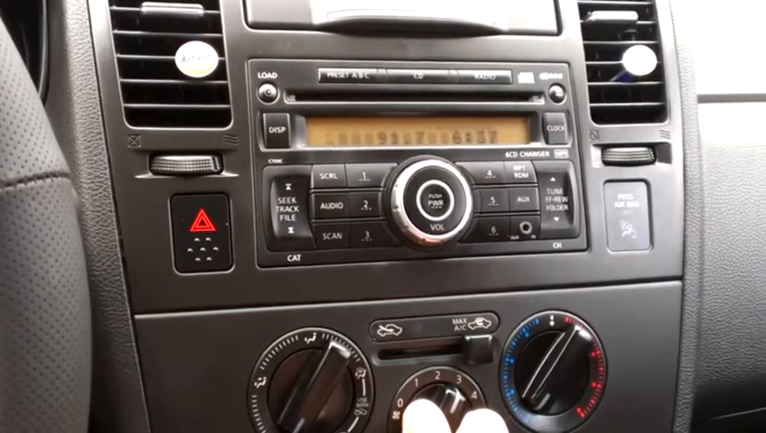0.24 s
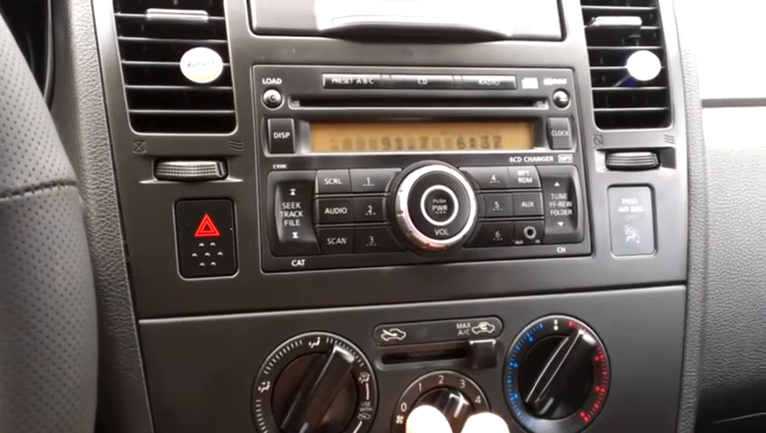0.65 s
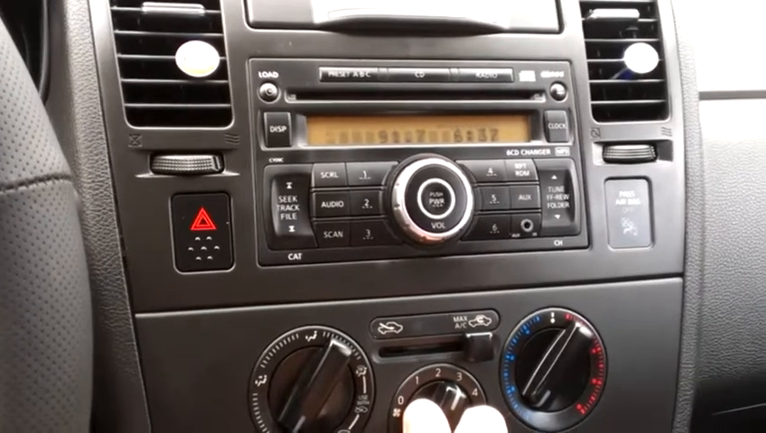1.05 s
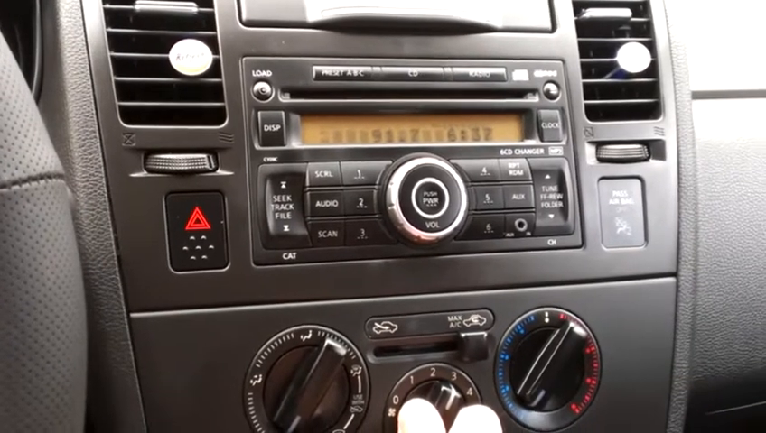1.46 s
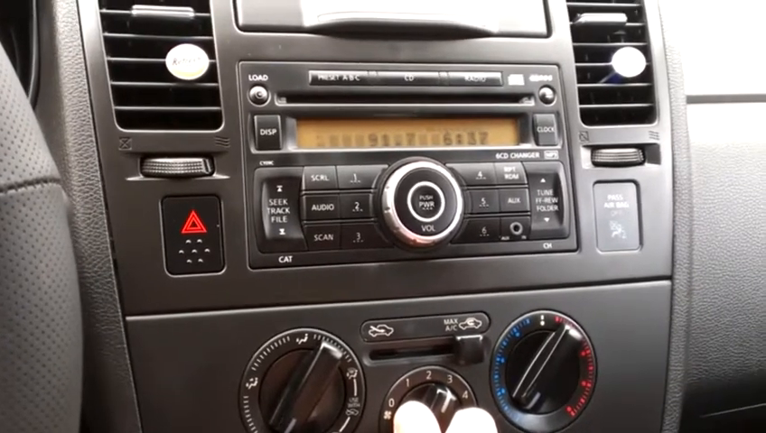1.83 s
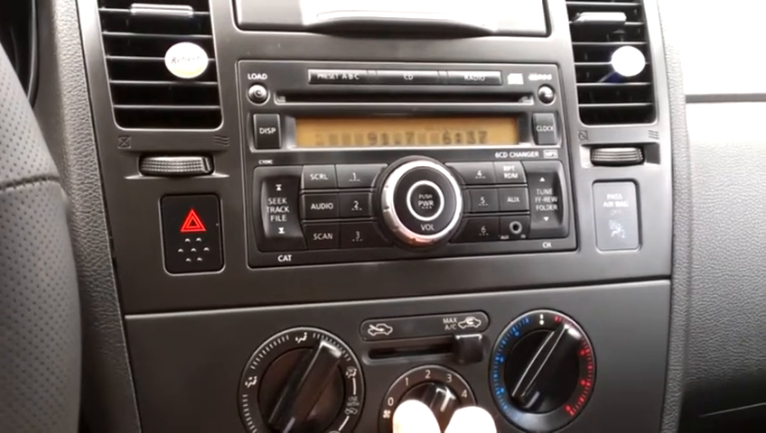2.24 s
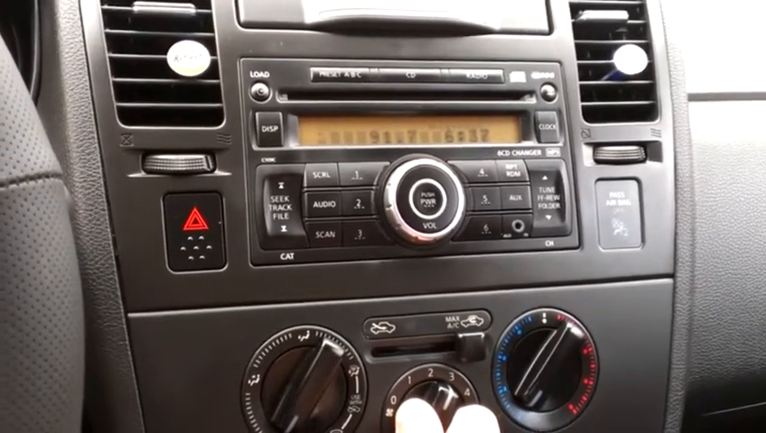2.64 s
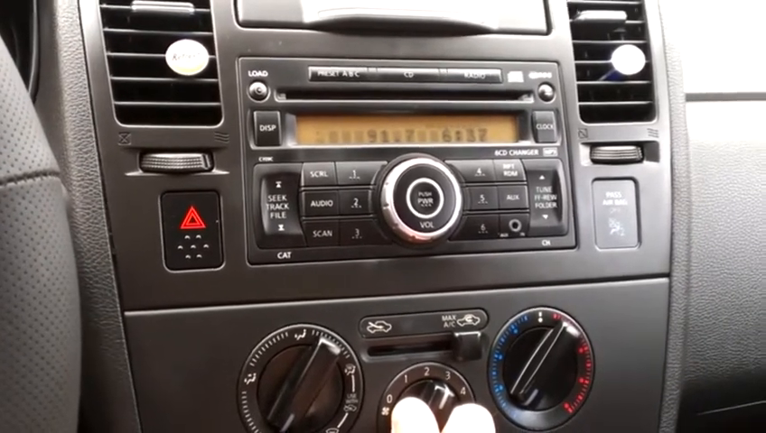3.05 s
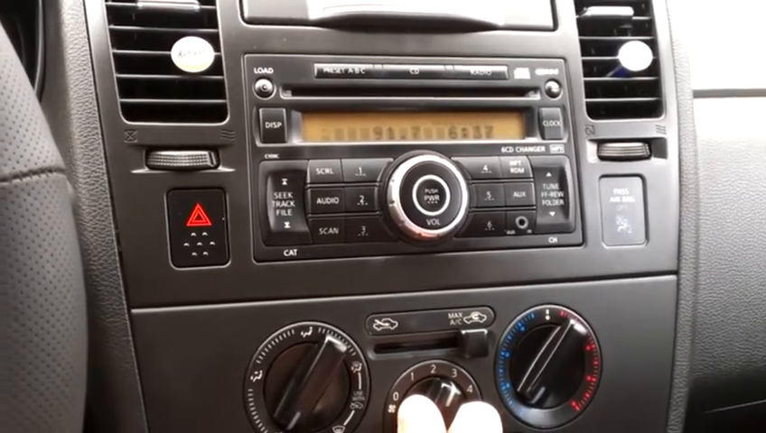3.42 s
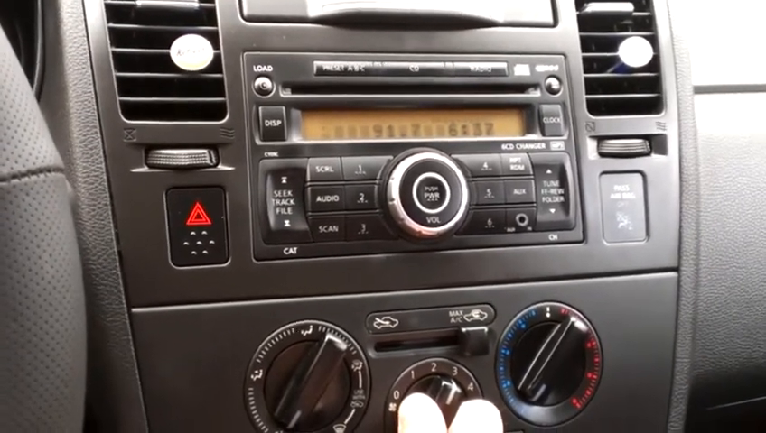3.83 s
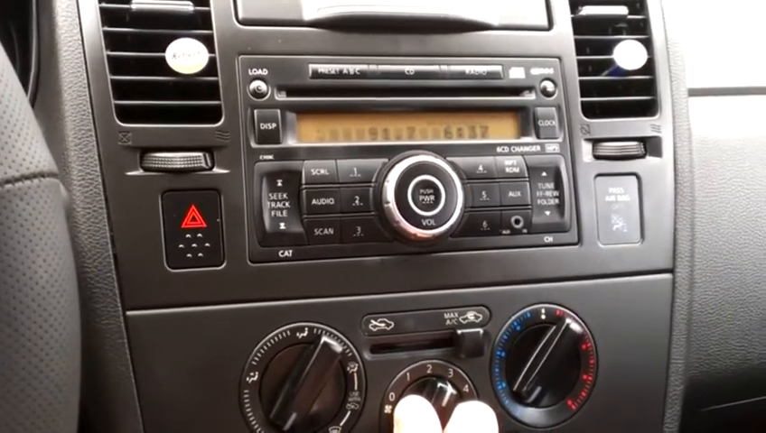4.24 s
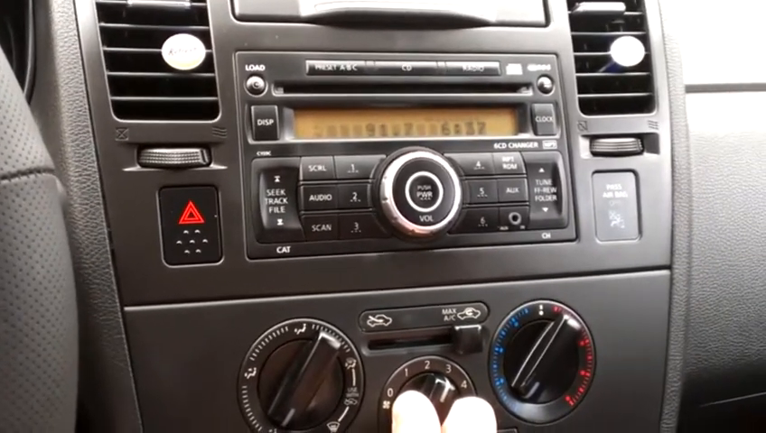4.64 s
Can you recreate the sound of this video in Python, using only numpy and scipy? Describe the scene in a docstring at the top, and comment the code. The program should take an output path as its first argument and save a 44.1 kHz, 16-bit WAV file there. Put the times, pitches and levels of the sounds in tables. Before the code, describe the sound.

Inside a small, closed car cabin, the ventilation blower runs on a high setting. Air rushes steadily through the vents above a low motor hum. The jet hits the stereo microphone close by, making irregular, rapid, dull thumps, mostly stronger on the right. The hiss briefly dulls under strong puffs and opens into airy wisps between them. Nothing starts or stops.

```python
"""A car's air-conditioning blower runs on a high setting, heard from just in front of the dash vents.
The fan wheel hums on the orders of its shaft, air rushes through ducts and louvres into the small cabin,
and the jet from the vents buffets the two microphone ports with a fluttering run of soft thumps.
The recorder turns the treble down for a moment whenever the buffeting is strong."""
import sys
import numpy as np
from scipy import signal
from scipy.fft import rfft, irfft, next_fast_len
from scipy.io import wavfile
from scipy.ndimage import uniform_filter1d, map_coordinates

SR = 44100
rng = np.random.default_rng(int(sys.argv[2]) if len(sys.argv) > 2 else 0)


def bounce(signal):
    """Save signal as a 16-bit WAV file at the path given by the first command-line argument."""
    frames = np.transpose(np.atleast_2d(signal))
    limited = np.clip(frames, -1, 1)
    pcm = np.round(limited * 32767).astype(np.int16)
    wavfile.write(sys.argv[1], SR, pcm)


N = 210979

# blower wheel: (s, turns per second Hz)
SHAFT = [(0.0, 44.96), (0.23, 45.7), (0.53, 45.7), (1.4, 45.51), (1.84, 45.82), (3.78, 45.87), (4.26, 46.01), (4.78, 46.2)]  # fixed
# hum and whine of the wheel: (multiple of the shaft rate, left dB, right dB)
WHEEL = [(2, -51, -50.6), (3, -33.2, -33.7), (4, -43.1, -41.7), (8, -42.6, -37.0), (13, -56.6, -53.9),
         (14, -57.3, -52.7), (17, -57.9, -58.5), (18, -57.1, -57.9), (19, -57.1, -57.0), (21, -57.9, -53.0),
         (22, -52.6, -54.1), (23, -52.8, -54.2), (24, -55.5, -55.8), (26, -62.5, -60.7), (29, -73.2, -60.6),
         (42, -60.9, -55.5), (43, -59.9, -60.5), (45, -63.8, -60.1), (46, -71.9, -61.6), (51, -65.0, -65.0),
         (60, -69.5, -72.0), (136, -76.5, -66.5), (143, -80, -70), (148, -73, -68)]  # fixed
# rush of air from the vents: (Hz, dB per Hz)
RUSH = [(60, -28), (250, 14.5), (820, 0.5), (1120, -2), (1230, -6.5), (1480, -7), (2200, -5), (2600, -7), (3200, -16.5), (4400, -26), (5200, -20), (7100, -16), (7900, -48), (11000, -57), (15000, -75)]
# duct and louvre resonances: (Hz, width Hz, left dB, right dB)
DUCTS = [(1022.4, 74, -49.5, -50.5), (1093, 63, -51.5, -52.5), (1700, 54, -60.5, -59), (1956, 80, -54.5, -56.5), (2071, 100, -67.5, -53), (2308, 77, -56, -58), (3510, 90, -70, -70), (3966, 440, -78, -57.5), (4330, 450, -68.5, -77), (5330, 800, -72.5, -60), (6350, 890, -89.5, -61)]
# slow level of the treble: (s, dB)
HISS = [(0, -2.5), (.33, -0.5), (.53, -5.5), (.8, -0.5), (1.4, -1), (2.05, 0.5), (2.45, -3.5), (2.8, 0), (3.5, -1.5), (4.15, -1), (4.5, -4.5), (4.78, -6)]
# strength of the jet as it wanders over the ports: (s, left dB, right dB)
JET = [(0, -24.5, -19), (0.55, -26, -19), (0.85, -26.5, -20), (1.35, -27, -19.5), (1.65, -20, -23),
       (1.9, -27, -21.5), (2.3, -21, -19), (3.0, -27.5, -19), (3.35, -19, -24.5), (3.65, -23.5, -21.5),
       (3.9, -26, -21.5), (4.15, -26, -20), (4.35, -29.5, -18), (4.78, -25.5, -20.5)]
# turbulence at a port: (Hz, dB per Hz)
BUFFET = [(30, -45), (70, -28.5), (90, -13.5), (125, -3.5), (180, 3.5), (260, 5.5), (360, 1), (500, -13.5), (700, -37), (1000, -33), (1600, -66), (6000, -110)]
# rough, tearing air around a strong eddy: (Hz, dB per Hz)
TEAR = [(200, -21.5), (450, 3.5), (620, -5), (850, -9), (1150, -26), (3000, -86.5)]
# the strongest eddies that hit the ports: (s, peak dB, pitch Hz, left minus right dB)
EDDIES = [(0.024, -8.0, 300, -12), (0.059, -12.0, 280, -13), (0.093, -13.0, 280, -9),
          (0.177, -8.5, 335, -10), (0.228, -12.0, 300, -6), (0.255, -7.0, 325, -11),
          (0.353, -8.5, 370, -10), (0.432, -11.5, 270, -9), (0.467, -9.5, 285, -11), (0.509, -8.5, 335, -11), (0.532, -10.0, 350, -7),
          (0.546, -11.5, 325, -5), (0.59, -10.5, 345, -14), (0.623, -4.0, 375, -11), (0.656, -11.0, 330, -9),
          (0.718, -9.5, 335, -12), (0.781, -12.5, 315, -8), (0.809, -13.0, 375, -12), (0.899, -10.0, 330, -11), (0.909, -8.5, 365, -10),
          (0.946, -13.0, 280, -7), (1.03, -13.0, 300, -13), (1.065, -15.0, 340, 8), (1.085, -11.5, 345, -7),
          (1.217, -13.0, 250, -10), (1.246, -9.5, 360, -12), (1.261, -13.5, 300, -12), (1.313, -12.0, 305, -13), (1.335, -13.5, 420, -13),
          (1.432, -4.0, 400, -11), (1.56, -13.0, 300, -1), (1.583, -10.0, 250, 0), (1.6, -12.5, 260, -11), (1.631, -13.0, 280, 14),
          (1.697, -12.0, 315, -6), (1.758, -11.5, 320, -10), (1.785, -9.5, 270, -9),
          (1.822, -13.0, 260, -6), (1.841, -12.0, 290, -12), (1.911, -13.0, 280, -9),
          (1.971, -10.5, 430, -11), (2.05, -12.5, 340, -11), (2.094, -9.5, 280, -8),
          (2.193, -14.0, 385, -6), (2.205, -14.0, 310, 6),
          (2.303, -9.0, 280, -8), (2.321, -13.0, 350, -12), (2.335, -12.5, 350, -12),
          (2.411, -10.5, 285, -10), (2.465, -12.0, 350, -9), (2.477, -8.5, 335, -9), 
          (2.491, -12.5, 270, -8), (2.533, -12.5, 370, -8), (2.541, -12.0, 325, -9),
          (2.59, -13.0, 390, -10), (2.618, -13.0, 310, -10), (2.665, -9.0, 340, -12), (2.823, -9.5, 340, -10), (2.891, -9.5, 345, -10),
          (2.94, -12.0, 315, -5), (3.023, -13.5, 330, -10), (3.075, -12.5, 380, -8), (3.186, -12.5, 375, -9), (3.203, -10.0, 410, -10),
          (3.278, -10.0, 275, -7), (3.367, -11.5, 290, -3), (3.395, -12.0, 350, -5), (3.417, -11.0, 340, -9), (3.569, -10.5, 320, -10),
          (3.642, -12.0, 310, -6), (3.697, -11.5, 350, 5), (3.772, -13.5, 370, -11), (3.789, -11.0, 295, -12), (3.811, -10.0, 365, -12), (3.911, -12.0, 260, -10),
          (3.921, -11.5, 335, -10), (3.942, -9.0, 350, -9), (4.007, -10.5, 290, -3), (4.051, -13.0, 360, -9), (4.216, -12.5, 420, -11),
          (4.303, -11.5, 325, 11), (4.313, -11.5, 270, 8), (4.323, -11.0, 325, -5), 
          (4.343, -10.0, 370, -11), (4.424, -12.0, 370, -11), (4.435, -6.0, 375, -5),
          (4.469, -13.5, 310, -4), (4.493, -13.0, 345, -9), (4.539, -10.5, 310, -14), (4.57, -6.5, 430, -14),
          (4.626, -11.5, 365, 8), (4.671, -9.5, 335, -7), (4.719, -8.0, 355, -10), (4.753, -13.0, 310, -10), (4.777, -11.0, 330, -11)]  # fixed
# low drone of the cabin: (Hz, dB per Hz)
DRONE = [(15, -9), (32, 3.5), (47, 16.5), (60, 11), (70, -0.5), (110, -35), (1000, -80)]
FLUTTER_DB, FLUTTER_HZ = 1, 11  # chance rise and fall of the jet
TOP_HZ = 14000  # fixed
TIME = np.arange(N) / SR
DUCK_KNEE_DB, DUCK_DEPTH_DB, DUCK_WINDOW_S = -14.5, 18, 0.016  # treble suppressor: half-way level, full cut, averaging time
# depth of the wavering of the low hum and of the high whine (share of their level)
HUM_WAVER, WHINE_WAVER = .13, .5  # fixed
# balance of the hiss: (left dB, right dB)
HISS_SIDES_DB = (-1.5, 1.5)  # fixed
# share of the treble cut that each channel takes: (left, right)
DUCK_SIDES = (1.2, 1)  # fixed
GUST_DB, GUST_FROM_DB = -3, -10  # the smooth churn gives way around a strong eddy (dB at full), and the eddy level from which this appears
# lulls of the jet, in which the treble opens up as a brief wisp: (s, length s, level dB)
WISPS = [(.015, .04, -4), (.31, .05, 0), (.745, .03, -9), (.86, .055, 0), (1.06, .04, -3),
         (1.125, .035, 1), (1.185, .045, -1), (1.38, .07, 0), (1.467, .035, -1), (1.54, .05, 0), (1.655, .035, -3),
         (1.725, .045, -2), (1.87, .04, -2), (2.015, .06, 1), (2.13, .03, -2), (2.27, .055, -4),
         (2.6, .035, -7), (2.75, .05, -4), (2.853, .03, -3), (2.917, .03, -7), (2.99, .06, -3), (3.325, .07, -5),
         (3.48, .06, -1), (3.74, .05, -2), (4.09, .035, -9), (4.165, .05, -9), (4.405, .03, -13)]  # fixed
# airy top of a wisp: (Hz, dB per Hz)
AIR = [(5000, -34), (7400, 4), (8200, 3.5), (11700, -1.5), (12300, -11.5), (14000, -19)]
# the treble dips briefly: (s, length s, depth dB)
DIPS = [(.177, .025, 22), (.475, .035, 26), (.54, .045, 26), (.912, .025, 9), (1.245, .032, 24), (1.44, .018, 14),
        (1.815, .05, 6), (2.478, .028, 22), (3.215, .04, 7), (3.56, .035, 7), (3.945, .045, 14), (4.475, .06, 8), (4.57, .032, 28)]  # fixed
WISP_DB, WISP_LIFT_DB = -58.5, 3  # at a full wisp: its airy top, the rise of the hiss
# fall of the jet in a lull: (left dB, right dB)
LULL_SIDES_DB = (-2.5, -8)  # fixed
# balance of a wisp: (left dB, right dB)
WISP_SIDES_DB = (-6, 4)  # fixed
# slow wandering of each duct resonance (dB, share of its pitch, changes per second)
DUCT_SWELL_DB, DUCT_DRIFT, DUCT_WANDER_HZ = 2, .01, 5  # fixed
# swelling of the drone: spread (dB), changes per second
DRONE_SWELL_DB, DRONE_SWELL_HZ = 1.2, 6  # fixed
# colour of a tick: (Hz, dB per Hz)
TICK = [(800, -16), (3000, 5.5), (7000, 5), (10500, -3), (13000, -29)]
# faint ticks: (s, level dB)
TICKS = [(0.615, -47), (3.279, -45), (4.302, -44), (4.324, -50)]  # fixed
# the rush flickers band by band: spread (dB), changes per second, edges of the bands (Hz)
FLICKER_DB, FLICKER_HZ, FLICKER_EDGES_HZ = 2, 20, (600, 950, 1300, 2000, 2900, 4000, 5500)  # fixed
GUST_RISE_S, GUST_FALL_S = .004, .015  # fixed


def undb(db):
    """Decibels to gain."""
    return 10 ** (np.asarray(db) / 20)


def unit(x):
    """Scale each channel to rms 1."""
    return x / np.sqrt(np.mean(x ** 2, axis=-1, keepdims=True))


def curves(table):
    """The columns of a timed table, one value per sample."""
    s, *columns = np.transpose(table)
    return np.array([np.interp(TIME, s, c) for c in columns])


def walk(rate):
    """Smooth chance with spread 1 that changes about rate times a second."""
    f = np.fft.rfftfreq(2048, 1 / 200)  # fixed
    slow = irfft(rfft(rng.standard_normal(2048)) * np.exp(-(f / rate) ** 2))  # fixed
    return unit(np.interp(TIME, np.arange(2048) / 200, slow))  # fixed


def colour(x, points):
    """Give a sound the spectrum of (Hz, dB) points, at rms 1."""
    hz, db = np.transpose(points)
    size = next_fast_len(N, True)
    f = np.maximum(np.fft.rfftfreq(size, 1 / SR), 1)
    return unit(irfft(rfft(x, size) * undb(np.interp(np.log(f), np.log(hz), db)), size)[..., :N])


def pair(shared):
    """Noise at the two ports, with a share of its power in common."""
    shared = np.clip(shared, 0, 1)
    return np.sqrt(shared) * rng.standard_normal(N) + np.sqrt(1 - shared) * rng.standard_normal((2, N))


def split(x, hz):
    """The parts of a sound below and above a frequency."""
    low = signal.sosfiltfilt(signal.butter(2, hz, fs=SR, output="sos"), x)
    return low, x - low


def shelf(x, treble_db, mid_depth=0.099, top_depth=1.08):
    """Raise or lower the treble, the more the higher it lies; the bass stays as it is."""
    low, rest = split(x, hz=800)
    mid, rest = split(rest, hz=2630)
    high, top = split(rest, hz=6850)
    return low + mid * undb(mid_depth * treble_db) + high * undb(treble_db) + top * undb(top_depth * treble_db)


def cabin(x, t60, wet_db):
    """Glass and trim close by send dense, quickly dying reflections to each port."""
    t = TIME[:SR // 5]
    tail = rng.standard_normal((2, len(t))) * np.exp(-np.log(1000) * t / t60)
    tail /= np.sqrt(np.sum(tail ** 2, axis=1, keepdims=True))
    return unit(x + undb(wet_db) * signal.fftconvolve(x, tail, axes=1)[:, :N])


def port(x, corner_hz=125):
    """A microphone port sheds the slow part of a push, so each puff rebounds briefly."""
    leak = signal.butter(3, corner_hz, "highpass", fs=SR, output="sos")
    return signal.sosfilt(leak, signal.sosfilt(leak, x))


def add(out, s, gains, hz, length=5.6):
    """One eddy sweeps over the ports: the pressure swings up, then down; the faster it passes, the higher the
    thump."""
    near = slice(max(int((s - .015) * SR), 0), int((s + .015) * SR))  # fixed
    passage = 2 * np.pi * hz * (TIME[near] - s)
    turn = np.pi / 2 + .6 * rng.standard_normal()  # fixed
    swirl = np.exp(1j * turn) / (1 - 1j * passage / length) ** (length + .5)
    out[:, near] += np.outer(gains, swirl.real)


def wheel(turns, waver_hz=9, hum_db=0, whine_db=0):
    """Each shaft order is a line; uneven inflow shakes the high ones more than the low hum."""
    out = 0
    for multiple, left_db, right_db in WHEEL:
        waver, db = (HUM_WAVER, hum_db) if multiple < 10 else (WHINE_WAVER, whine_db)
        size = unit(np.abs(1 + waver * walk(waver_hz)))
        phase = 2 * np.pi * (multiple * turns + rng.random()) + waver * walk(waver_hz)
        out = out + undb([[left_db + db], [right_db + db]]) * np.sqrt(2) * size * np.sin(phase)
    return out


def vents(turns, body_db=(-39.5, -35), hiss_db=-35, throb=0.11, swish=0.68):
    """Air rushes through the grilles and rings the ducts, throbbing once for each turn of the wheel."""
    wobble = np.cos(2 * np.pi * turns)
    beat = 1 + throb * wobble
    # long waves reach both ports alike; short ones arrive scattered
    body, _ = split(cabin(colour(pair(shared=.72), RUSH), t60=.07, wet_db=-7), hz=2700)  # fixed
    _, hiss = split(cabin(colour(pair(shared=.65), RUSH), t60=.11, wet_db=3), hz=2700)  # fixed
    rings = 0
    for hz, width, left_db, right_db in DUCTS:
        band = signal.butter(2, [hz - width / 2, hz + width / 2], "bandpass", fs=SR, output="sos")
        ring = drift(signal.sosfilt(band, pair(shared=.9)))  # fixed
        rings = rings + undb([[left_db], [right_db]]) * ring
    # the treble adds a short swish at the crest of each turn
    crest = swish * np.exp(8 * (wobble - 1))
    return (body * undb(body_db)[:, None] + rings) * beat + hiss * undb(hiss_db) * undb(HISS_SIDES_DB)[:, None] * (beat + crest)


def buffeting(jet_db=-2.0, whirl_db=-7, whirl_hz=320, whirl_left_db=-4, whirl_octaves=0.92, tear_db=-30, count=520):
    """Patchy turbulence at the ports, strewn with small quick whirls; it flares and brightens around each strong eddy."""
    churn = colour(pair(shared=0.63), BUFFET)
    whirls = np.zeros((2, N))
    for place, size, speed, side in rng.random((count, 4)):
        add(whirls, place * TIME[-1], (0.52 + size) * np.array([0.18 + side, 1]), whirl_hz * 2 ** (whirl_octaves * (speed - .5)))
    whirls = unit(port(whirls)) * undb([[whirl_db + whirl_left_db], [whirl_db]])
    gusts = np.zeros((2, N))
    for s, db, _, pan_db in EDDIES:
        near = np.abs(TIME - s) < np.pi * GUST_FALL_S
        spread = np.where(TIME[near] < s, GUST_RISE_S, GUST_FALL_S)
        sides = undb(np.minimum([pan_db, -pan_db], 0)) / (0.5 + np.exp(GUST_FROM_DB - db))
        gusts[:, near] += np.outer(sides, np.exp(-.5 * ((TIME[near] - s) / spread) ** 2))
    flutter = unit(walk(FLUTTER_HZ) + np.array([walk(FLUTTER_HZ), walk(FLUTTER_HZ)]))
    tear = colour(pair(shared=.95), TEAR) * gusts * undb(tear_db)
    return unit((churn + whirls) * undb(GUST_DB * gusts + FLUTTER_DB * flutter)) * undb(curves(JET) + jet_db) + tear


def thumps(thump_db=1.0, lead_db=-14, wake_db=-5.5, wake_speed=0.76, spacing_s=0.00527):
    """The strongest eddies stand out as puffs; each travels between a forerunner and a slower wake."""
    out = np.zeros((2, N))
    for (s, db, hz, pan_db), (early, late) in zip(EDDIES, rng.random((len(EDDIES), 2)) - .5):
        gains = unit(undb([pan_db / 2, -pan_db / 2])) * undb(db + thump_db)
        add(out, s - spacing_s * 2 ** early, gains * undb(lead_db), hz)
        add(out, s, gains, hz)
        add(out, s + spacing_s * 2 ** late, gains * undb(wake_db), hz * wake_speed)
    return port(out)


def overload(x, soft_hz=1100):
    """The ports give way softly under the hardest pushes; the puffs stay dull."""
    give = .95 * np.tanh(x / .95) - x  # fixed
    return x + port(split(give, hz=soft_hz)[0])


def bell(s, length):
    """A smooth, flat-topped swell of height 1 around a moment."""
    return 1 / (1 + np.square(np.square(np.square(2 * (TIME - s) / length))))


def drift(x):
    """A resonance wanders in pitch and strength with the flow."""
    place = np.arange(N) + np.cumsum(DUCT_DRIFT * walk(DUCT_WANDER_HZ))
    moved = np.array([map_coordinates(side, [place], mode="mirror") for side in x])
    return unit(moved * undb(DUCT_SWELL_DB * walk(DUCT_WANDER_HZ)))


def flicker(x):
    """Above the low body of the rush, each band rises and falls a little on its own."""
    out, rest = split(x, hz=FLICKER_EDGES_HZ[0])
    for edge in FLICKER_EDGES_HZ[1:]:
        band, rest = split(rest, hz=edge)
        out = out + band * undb(FLICKER_DB * walk(FLICKER_HZ))
    return out + rest


def ticks(decay_s=.004):
    """A few faint, dry ticks, mostly on the right."""
    strike = sum(undb(db) * (TIME >= s) * np.exp(-np.abs(TIME - s) / decay_s) for s, db in TICKS)
    return colour(pair(shared=0.97), TICK) * strike * undb(WISP_SIDES_DB)[:, None]


def scene():
    """The wheel drives hum and rush, whose treble opens and dips; the jet plays on the ports over the drone of the cabin."""
    turns = np.cumsum(curves(SHAFT)[0] * (1 + .0014 * walk(6))) / SR  # fixed
    drone = colour(pair(shared=0.35), DRONE) * undb([[-66], [-63]]) * undb(DRONE_SWELL_DB * walk(DRONE_SWELL_HZ))
    wisps = sum(undb(db) * bell(s, length) for s, length, db in WISPS)
    lulls = np.minimum(sum(bell(s, length) for s, length, _ in WISPS), 1)
    dips_db = sum(db * bell(s, length) for s, length, db in DIPS)
    blower = shelf(wheel(turns) + flicker(vents(turns)), curves(HISS)[0] + WISP_LIFT_DB * wisps, mid_depth=.3)  # fixed
    air = colour(pair(shared=0.32), AIR) * wisps * undb(WISP_DB) * undb(WISP_SIDES_DB)[:, None]
    jet = buffeting() * undb(np.outer(LULL_SIDES_DB, lulls)) + thumps()
    return shelf(blower + air, -dips_db) + overload(jet) + ticks() + drone


def suppress(x):
    """A suppressor follows the low rumble at the louder port and turns the treble down as it grows."""
    rumble, _ = split(x, hz=850)
    size = max(int(DUCK_WINDOW_S * SR), 1)
    power = uniform_filter1d(uniform_filter1d(rumble ** 2, size), size).max(axis=0)
    over = (power / undb(DUCK_KNEE_DB) ** 2) ** 2
    return shelf(x, -DUCK_DEPTH_DB * np.outer(DUCK_SIDES, over / (1 + over)))


def record(dry):
    """The recorder ducks the treble under the buffeting and cuts the top."""
    return signal.sosfilt(signal.ellip(8, .2, 70, TOP_HZ, fs=SR, output="sos"), suppress(dry))  # fixed


dry = scene()
out = record(dry)
bounce(out)
```